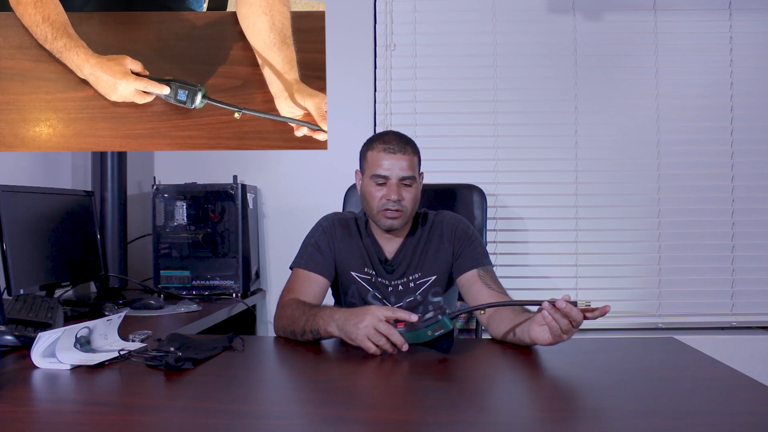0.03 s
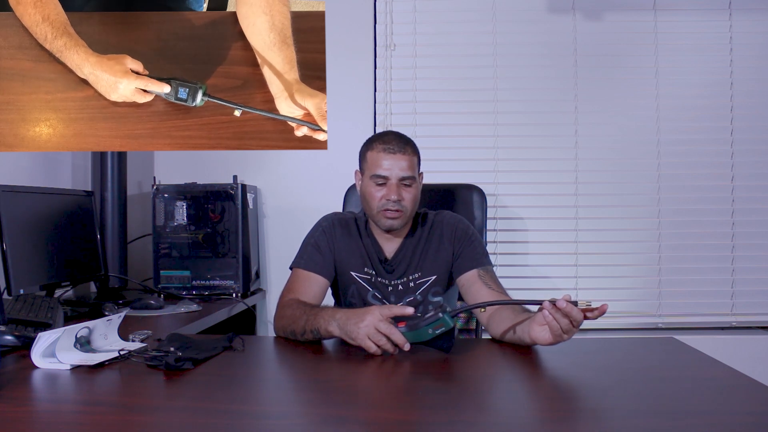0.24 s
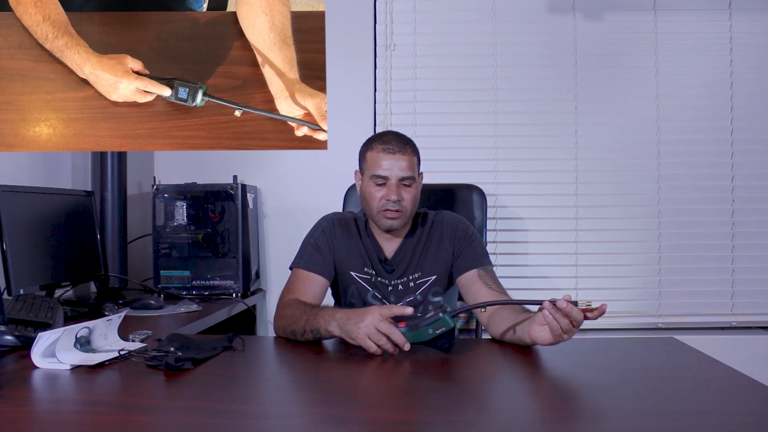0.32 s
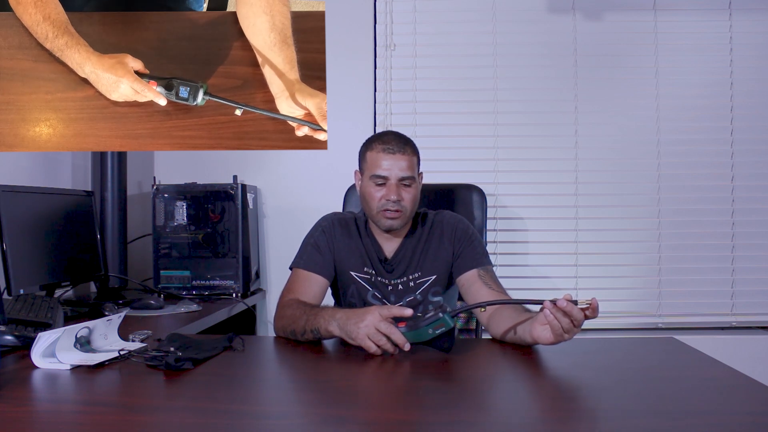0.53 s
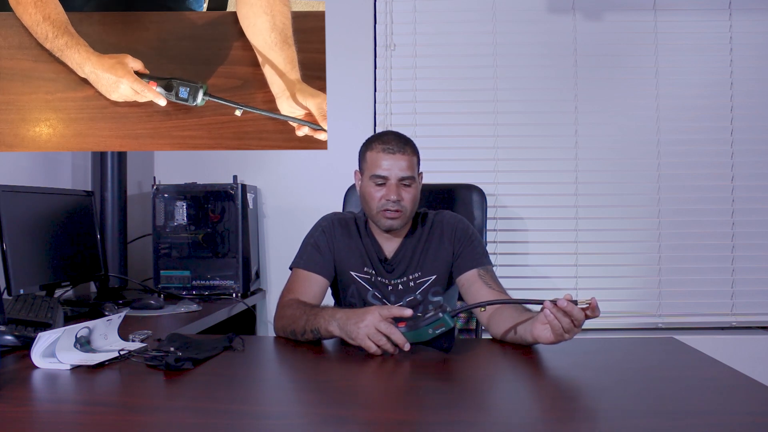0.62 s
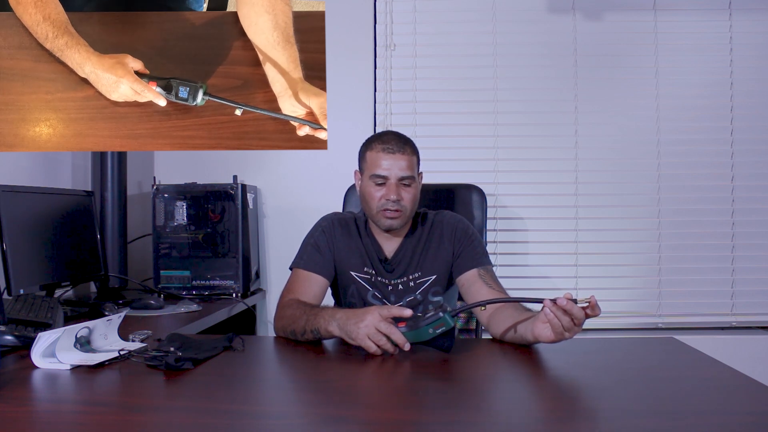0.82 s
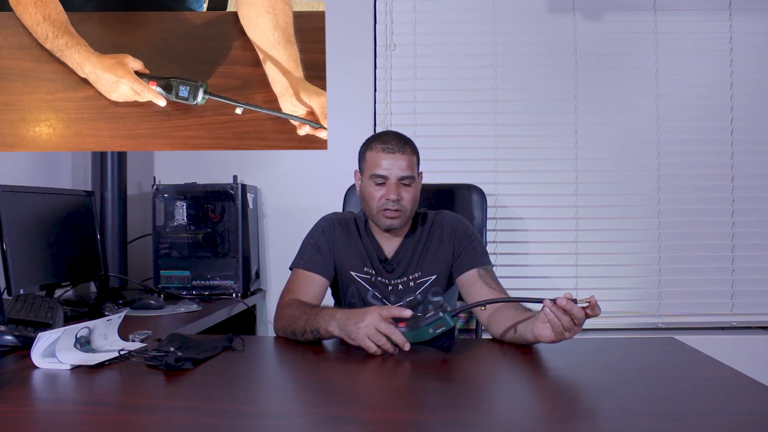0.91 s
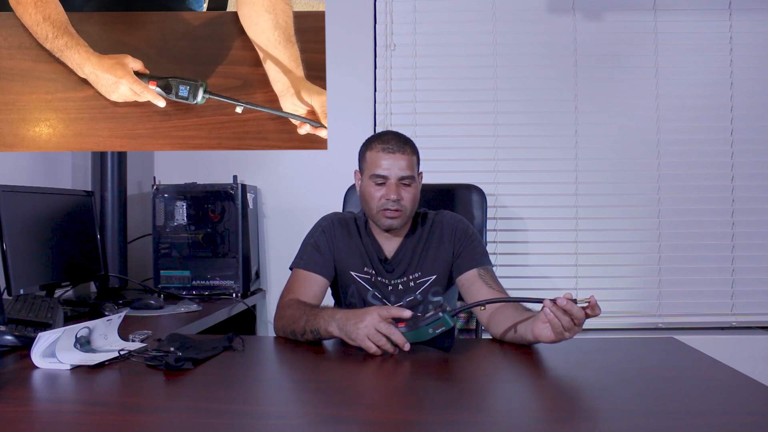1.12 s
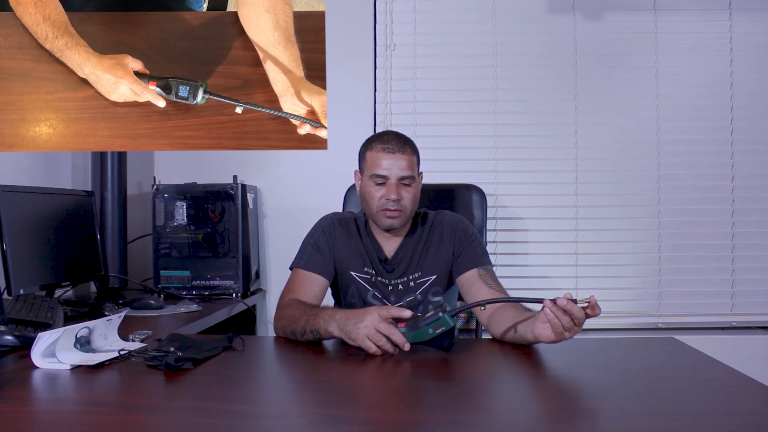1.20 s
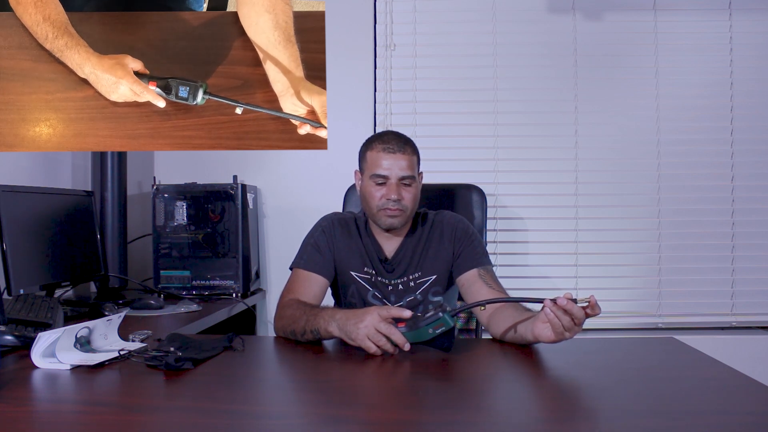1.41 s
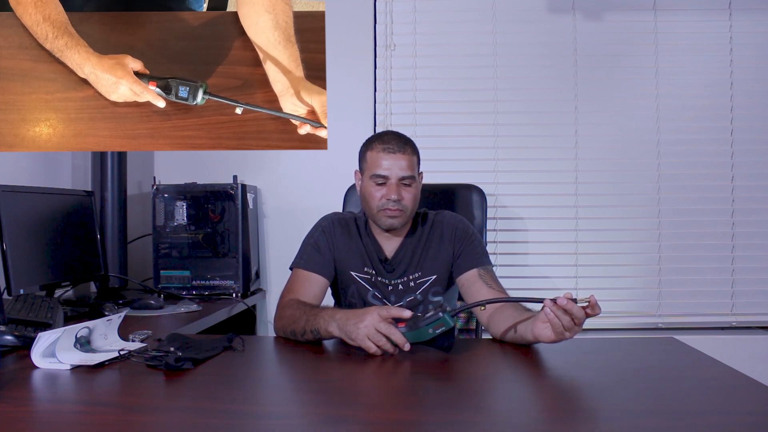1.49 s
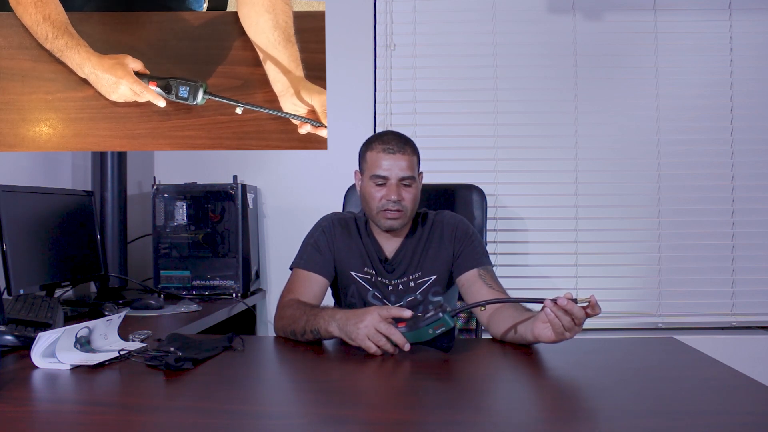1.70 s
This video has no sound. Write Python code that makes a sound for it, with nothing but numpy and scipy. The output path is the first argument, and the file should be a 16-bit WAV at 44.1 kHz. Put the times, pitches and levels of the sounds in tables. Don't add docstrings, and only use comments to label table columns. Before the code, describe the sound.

Small handheld air compressor kicks on with a jolt, buzzes and rattles loudly, then clunks to a stop

```python
import sys
import numpy as np
from scipy import signal
from scipy.fft import rfft, irfft
from scipy.io import wavfile
from scipy.ndimage import uniform_filter1d

SR = 44100
rng = np.random.default_rng(int(sys.argv[2]) if len(sys.argv) > 2 else 0)


def store_pcm(level_fs):
    pcm = np.round(np.clip(level_fs, -1, 1) * 32767).astype(np.int16)
    wavfile.write(sys.argv[1], SR, np.atleast_2d(pcm).T)


def voltage_ratio(level):
    return 10 ** (np.asarray(level, float) / 20)


N = 77175
t = np.arange(N) / SR
START_S, POWER_OFF_S = .165, .95
GRAIN_DB = 1


def curve(rows):
    return np.interp(t, *np.array(rows, float).T)


def unit(x):
    return x / np.sqrt(np.mean(x ** 2))


def ring(x, hz, width_hz):
    return signal.lfilter(*signal.iirpeak(hz, hz / width_hz, fs=SR), x)


def walk(rate_hz):
    k = int(SR / rate_hz)
    smooth = uniform_filter1d(rng.standard_normal(N), k)
    return unit(uniform_filter1d(smooth, k))


def coloured(x, points):
    hz, db = np.array(points, float).T
    f = np.arange(N // 2 + 1) * SR / N
    gain = voltage_ratio(np.interp(np.log(f + 1), np.log(hz), db))
    return unit(irfft(rfft(x) * gain, N))


def grit(spread_db):
    size_db = spread_db * np.minimum(rng.exponential(size=N), 4)
    return unit(rng.standard_normal(N) * voltage_ratio(size_db))


# f/Hz, level/dB
FLOOR_SPECTRUM = [(24, -80), (40, -55), (114, -9.5), (449, -18.5), (591, -7), (722, -9.5), (1350, -10.5),
                  (8960, -26), (15500, -41)]
# t/s, level/dB
FLOOR_LEVEL = [
    (0, -54.5),
    (.05, -54.5),
    (.2, -66),
    (1.6, -64.5),
    (1.68, -60.5),
    (1.75, -59),
]


def background():
    return coloured(rng.standard_normal(N), FLOOR_SPECTRUM) * voltage_ratio(curve(FLOOR_LEVEL) + walk(16))


# t/s, level/dB
RUB_LEVEL = [
    (0.051, -59),
    (0.054, -41.5),
    (0.066, -35.5),
    (0.089, -33),
    (0.101, -38),
    (.115, -36.5),
    (0.136, -43),
    (.165, -43.5),
]
# f/Hz, level/dB
RUB_SPECTRUM = [(24, -57), (40, -15), (372, -30.5), (704, -8.5), (1330, -9), (2400, -1), (5130, -20),
                (8370, -19.5), (14000, -47)]


def finger():
    slips = grit(GRAIN_DB) * voltage_ratio(3.2 * walk(300))
    level_db = curve([(.045, -74), *RUB_LEVEL, (.175, -82)])
    return coloured(slips, RUB_SPECTRUM) * voltage_ratio(level_db)


def room(x):
    t60_s, top_t60_s, level_db, delay_s = .42, .33, -10, .006
    late = t[:SR // 2]
    noise = rng.standard_normal((2, len(late)))
    low = ring(ring(noise[0], 1600, 2800), 1100, 2600) * voltage_ratio(-60 * late / t60_s)
    top = .81 * ring(noise[1], 5800, 7900) * voltage_ratio(-60 * late / top_t60_s)
    tail = (low + top) * (late > delay_s)
    return voltage_ratio(level_db) * signal.fftconvolve(x, tail / np.sqrt(np.sum(tail ** 2)))[:N]


# t/s, level/dB, f/Hz
LATCH_TICKS = [
    (0.063, -39, 7500),
    (1.065, -52.5, 10200),
    (1.146, -54, 8500),
]


def ticks():
    out = 0
    for s, db, hz in LATCH_TICKS:
        click = np.exp(-((t - s) / .0005) ** 2)
        out = out + voltage_ratio(db) * click * unit(ring(rng.standard_normal(N), hz, 4000))
    return out


# t/s, rate/(turns per s)
CRANK_SPEED = [(0.165, 20.03), (0.22, 31.6), (0.28, 39.18), (0.35, 40.96), (0.45, 41.21), (0.58, 41.51),
               (0.65, 39.83), (0.7, 42.55), (0.76, 44.52), (0.86, 43.65), (0.94, 42.11), (0.98, 35.56),
               (1.03, 23.78), (1.07, 9.6), (1.3, 7.9)]


def crank():
    start_turn = -.39
    return start_turn + np.cumsum(curve(CRANK_SPEED) * (t > START_S)) / SR


def hose_free():
    freed_s, freeing_s = .68, .05
    return np.clip((t - freed_s) / freeing_s + .5, 0, 1)


def load(turn):
    rise, fall, rebound_at, rebound_fall = .05, .27, .46, .14
    rest, rebound = .48, .25
    coast_sharp = .54
    stroke = np.clip(np.floor(turn + rise).astype(int) + 1, 0, 49)
    size = voltage_ratio(.8 * rng.standard_normal((50, 2)))[stroke].T

    def hump(p, width):
        return np.clip(p / rise, 0, 1) * np.exp(-(p / width) ** 2.6)

    push = size[0] * hump((turn + rise) % 1, fall)
    back = rebound * size[1] * hump((turn - rebound_at) % 1, rebound_fall)
    return (rest + push + back) ** np.where(t > POWER_OFF_S, coast_sharp, 1)


# t/s, level/dB
MESH_LEVEL = [
    (.19, -13),
    (.25, -3),
    (.33, 2),
    (.6, 0),
    (.8, -2),
    (.97, 2.5),
    (.995, -22),
    (1.06, -48),
]
# multiple of the tooth rate, hose-held level/dB, hose-free level/dB
MESH_OVERTONES = [
    (1, -25, -20.5),
    (2, -30, -21),
    (3, -34.5, -24),
]


def gears(turn, free, force):
    tooth_count, shaft_per_turn, shaft_wobble = 45, 5.9, .5
    ripple_once, ripple_twice, ripple_held = .02, .04, .5
    sharp_held, sharp_free = .85, 1.7
    rough_db, drift = 2, .25
    gearbox_hz, gearbox_width_hz, gearbox_past = 1860, 350, .4
    a = 2 * np.pi * turn
    swing = ripple_once * np.sin(a + .5) + ripple_twice * np.sin(2 * a - .15) / 2
    swing = swing * (ripple_held + (1 - ripple_held) * free)
    teeth = tooth_count * (a + swing) + drift * walk(90)
    sharp = sharp_held + (sharp_free - sharp_held) * free
    tones = 0
    for k, held, loose in MESH_OVERTONES:
        level = voltage_ratio(held + (loose - held) * free + rough_db * walk(250))
        tones = tones + np.sin(k * teeth) * level * force ** (k ** .5 * sharp) * 1.15
    wobble = 1 + shaft_wobble * np.cos(shaft_per_turn * a)
    whine = voltage_ratio(curve(MESH_LEVEL)) * wobble * tones
    return gearbox_past * whine + ring(whine, gearbox_hz, gearbox_width_hz)


# f/Hz, bandwidth/Hz, level/dB
CASE_MODES = [(556, 690, -25), (960, 580, -10), (1562, 1500, -6.5), (2052, 760, -14), (2593, 530, -14),
              (4320, 500, -24.5), (4480, 300, -11.5), (5070, 480, -15.5), (6455, 700, -13),
              (8040, 600, -21.5), (9900, 2100, -20), (11540, 790, -15.5), (13400, 800, -34),
              (14410, 820, -46.5)]


def clatter(force, free):
    level_db, shared_share, free_treble_db = -23.5, .48, 1.5
    shared, out = grit(GRAIN_DB), 0
    for hz, width, db in CASE_MODES:
        grains = shared_share * shared + (1 - shared_share) * grit(GRAIN_DB)
        shake = grains * force * voltage_ratio(2 * walk(220) + free_treble_db * free * (hz > 7000))
        out = out + voltage_ratio(db) * ring(ring(shake, hz, width), hz, width)
    return voltage_ratio(level_db) * unit(out) * 1.313


# multiple of the crank rate, level/dB
HELD_ORDERS = [(1, -46), (2, -27), (3, -7), (4, -6), (5, -11), (6, -6), (7, -7), (8, -3), (9, -9), (10, -5),
               (11, -3), (12, -12), (13, 0), (14, -3), (15, -5), (16, -9), (17, -3), (18, -4)]
# multiple of the crank rate, level/dB
FREE_ORDERS = [(1, -50), (2, -21), (3, -27), (4, -14), (5, -19), (6, -14), (7, -11), (8, -12), (9, -15),
               (10, -8), (11, -17), (12, -7), (13, -18), (14, -6), (15, -5), (16, -5), (17, -4), (18, 0)]


def piston(turn, free):
    held_db, free_db, free_top_order = -36, -32, 12
    start = rng.uniform(0, 2 * np.pi, len(HELD_ORDERS))
    hum = 0
    for (k, a), (_, b), phase in zip(HELD_ORDERS, FREE_ORDERS, start):
        level = (1 - free) * voltage_ratio(held_db + a) + free * voltage_ratio(free_db + b) * (k <= free_top_order)
        hum = hum + np.sin(2 * np.pi * k * turn + phase) * level * voltage_ratio(1.5 * walk(25))
    return hum * voltage_ratio(.5 * curve(MESH_LEVEL))


def valve(turn, free):
    at_turn, hz, width_hz, held_db, free_db = .41, 820, 500, -21, -13.5
    level = voltage_ratio(held_db + (free_db - held_db) * free + 2 * walk(40))
    pop = np.diff(np.floor(turn - at_turn), prepend=-1) * level
    return ring(ring(pop, hz, width_hz), hz, 2000) * SR / width_hz / 2


# t/s, level/dB
DRIVE_LEVEL = [(.167, -6), (.171, -20.5), (.19, 4), (.35, 0.5), (.65, 0.5), (.95, -2.5), (1.0, -3),
               (1.05, -8), (1.075, -17.5), (1.14, -10.5), (1.18, -30), (1.24, -26.5), (1.31, -54),
               (1.4, -70)]


def pump():
    dull_hz, dull_share = 5000, .85
    turn, free = crank(), hose_free()
    force = load(turn)
    parts = gears(turn, free, force) + clatter(force, free) + piston(turn, free) + valve(turn, free)
    out = parts * voltage_ratio(curve(DRIVE_LEVEL)) * (t > .168)
    run_down = (t - POWER_OFF_S - .04) / .19
    run_up = (START_S + .05 - t) / .041
    slow = dull_share * np.clip(np.maximum(run_down, run_up), 0, 1)
    return out - slow * (out - signal.lfilter(*signal.butter(2, dull_hz, fs=SR), out))


# t/s, peak level/dB, f/Hz, push/ms
CASE_KNOCKS = [(0.171, -18.5, 2220, 5.9), (.179, -2.5, 1140, 5.2), (.183, -10.5, 1130, 6.2),
               (.182, -17, 629, 16), (.183, -8, 1610, 3.3), (1.001, -11, 1233, 12), (1, -15, 2400, 3),
               (1.039, -8, 963, 5.5), (1.047, -13, 1260, 7), (1.047, -15.5, 748, 3.7),
               (1.053, -23, 625, 5.4), (1.063, -10.5, 1860, 2), (1.131, -19.5, 1237, 6.8),
               (1.134, -32.5, 1840, 9.8), (1.142, -22, 900, 3.8), (1.698, -52, 1098, 1.2)]


def knocks():
    out = 0
    for s, db, hz, ms in CASE_KNOCKS:
        late = (t - s) * 1000 / ms
        push = np.exp(-(late - .5) ** 2 * 4)
        tone = np.sin(2 * np.pi * hz * (t - s)) + .25 * np.sin(2 * np.pi * 1.36 * hz * (t - s))
        band = unit(ring(ring(rng.standard_normal(N), hz * 1.06, hz), hz * 1.06, hz))
        out = out + voltage_ratio(db) * push * (.63 * tone + .49 * band)
    return out


def scene():
    floor = background()
    near = finger() + ticks() + pump() + knocks()
    return (near + room(near) + floor)[None]


def top_cut(x):
    return signal.sosfilt(signal.butter(12, 15740, fs=SR, output="sos"), x)


def record(dry):
    overload = .9
    rounded = np.tanh(overload * dry) / overload
    mix = signal.sosfilt(signal.butter(3, 70, "high", fs=SR, output="sos"), rounded)
    return top_cut(mix)


dry = scene()
out = record(dry)
store_pcm(out)
```